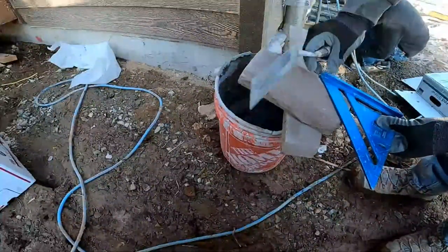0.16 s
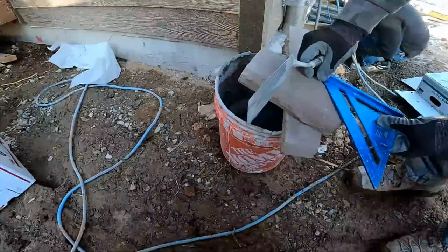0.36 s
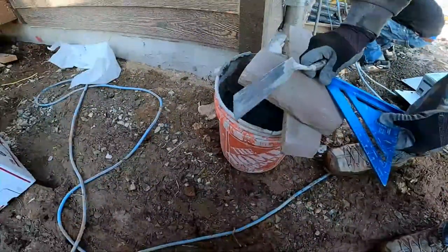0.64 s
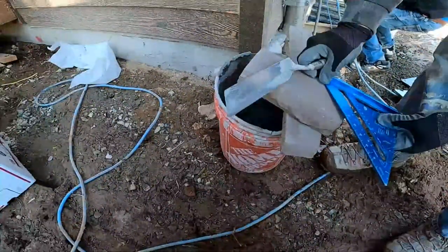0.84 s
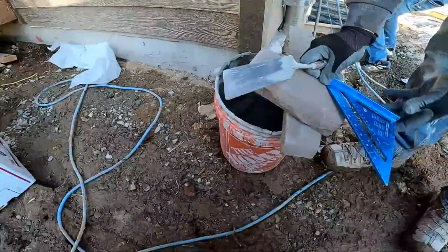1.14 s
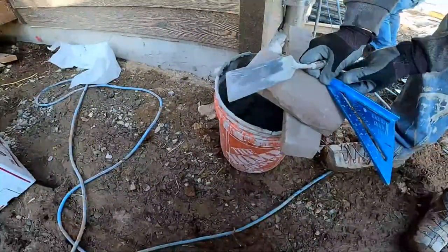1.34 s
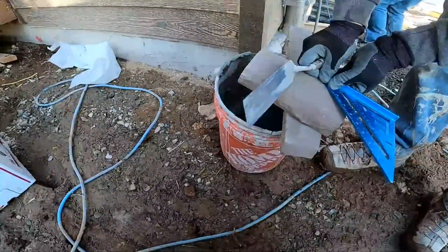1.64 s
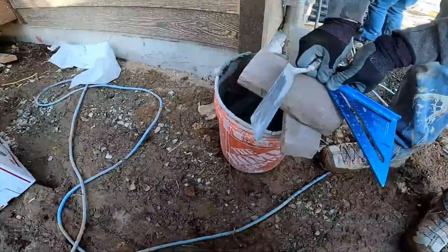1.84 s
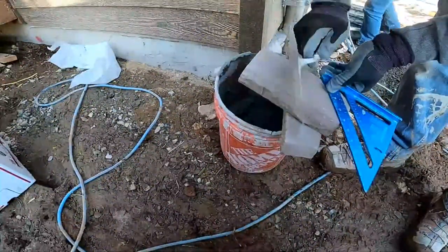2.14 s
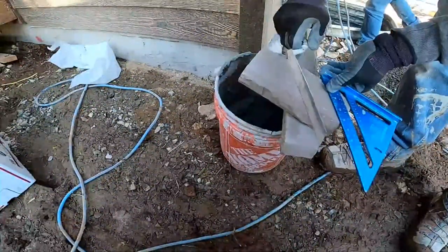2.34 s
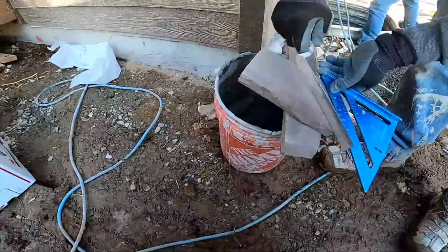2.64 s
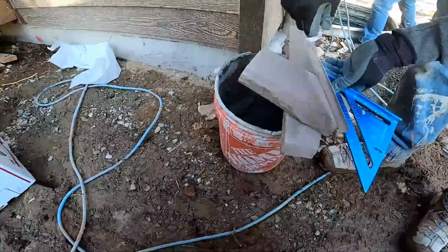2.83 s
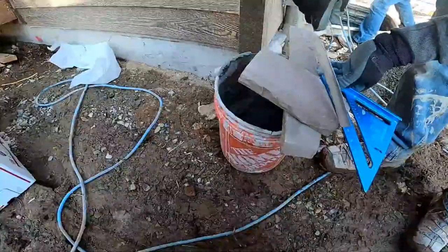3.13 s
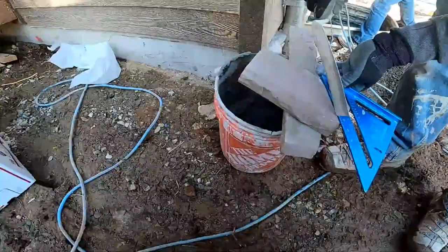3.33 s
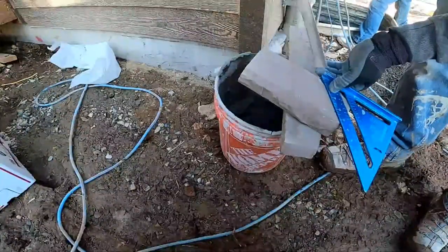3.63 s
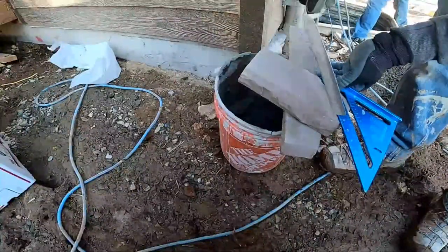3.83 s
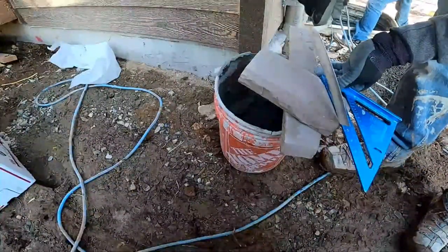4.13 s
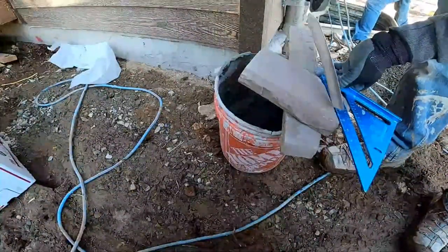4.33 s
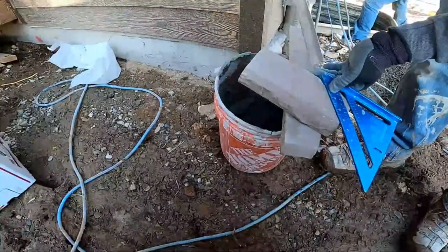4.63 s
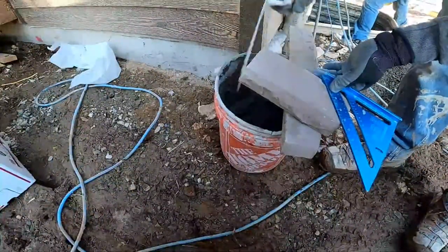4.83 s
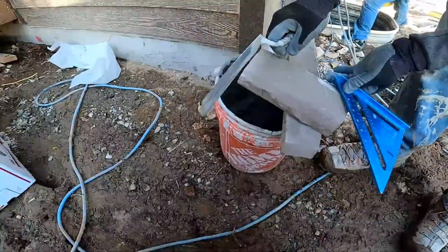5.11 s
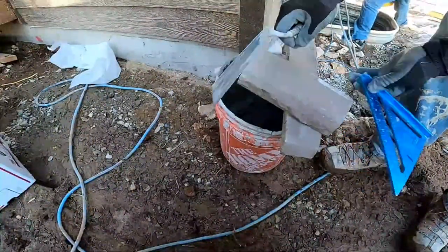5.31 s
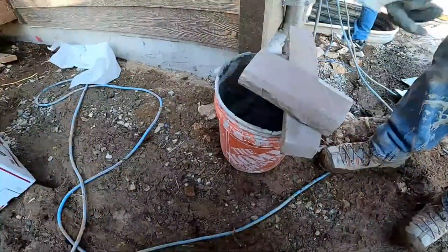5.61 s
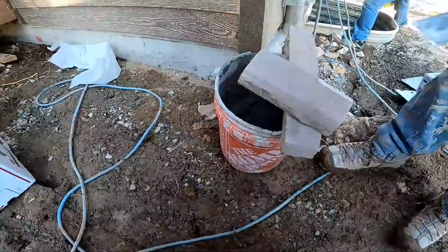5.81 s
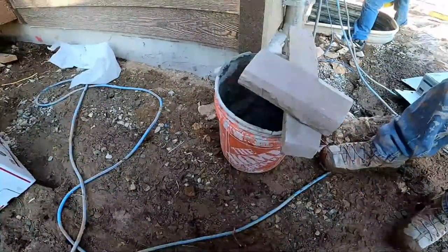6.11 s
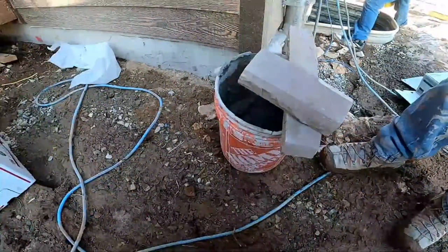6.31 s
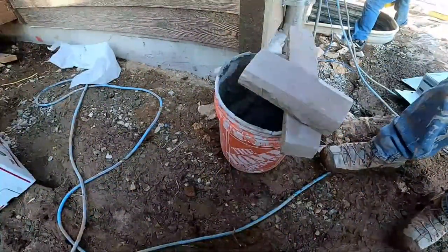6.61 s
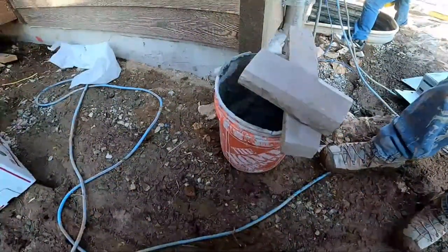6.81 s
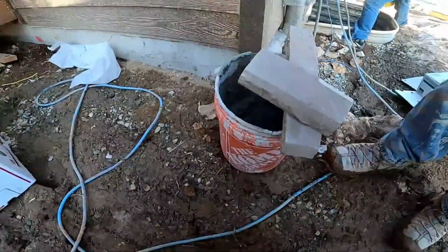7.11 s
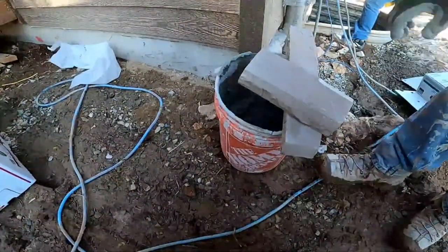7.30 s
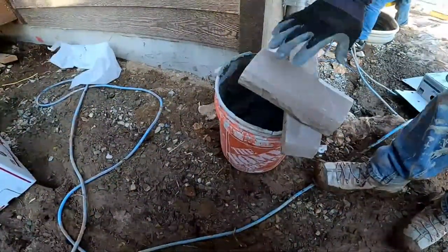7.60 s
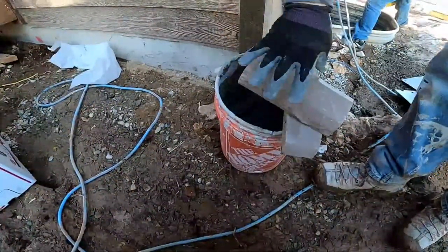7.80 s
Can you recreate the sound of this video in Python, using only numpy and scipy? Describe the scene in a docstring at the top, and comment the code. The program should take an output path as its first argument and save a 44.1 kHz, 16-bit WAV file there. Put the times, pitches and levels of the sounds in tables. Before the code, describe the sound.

A steel trowel scrapes and rings against a metal square amid gritty stone knocks outdoors, then the square drops and something heavy bumps loudly.

```python
"""A steel blade rings and gloves and grit rub at once, outdoors by a wall, over a faint low rumble.
A mason scrapes a trowel along a metal square on a stone slab that rocks on a plastic bucket: coloured
clicks and noise make the rubs, and drive or ring the dying sines of the blade.
The square is dropped and bounces as bursts of modes; something heavy bumps as lumpy resonant noise,
among stone knocks and hollow taps. Scattered echoes and a phase and balance offset spread it in stereo."""
import sys
import numpy as np
from scipy import signal
from scipy.fft import rfft, irfft, next_fast_len
from scipy.io import wavfile
from scipy.ndimage import uniform_filter1d

SR = 44100
rng = np.random.default_rng(int(sys.argv[2]) if len(sys.argv) > 2 else 0)


def wav_out(sig):
    """Save sig, one row per channel (or a flat mono array), as 16-bit PCM at SR to the path in sys.argv[1]."""
    wavfile.write(sys.argv[1], SR, np.round(np.clip(np.atleast_2d(sig).T, -1, 1) * 32767).astype(np.int16))


N = 350595

# Spectrum of the outdoor air: (frequency [Hz], relative level [dB per Hz])
AIR_SPECTRUM = [(20, 0.5), (97, -19.5), (283, 2.5), (632, -11), (1200, -4.5), (2050, -13.5), (7610, -38),
                (12000, -57), (15600, -99)]
AIR_DB = -67.5
# Low outdoor rumble: (time [s], level [dB])
RUMBLE_LEVEL = [(0.0, -71.5), (.75, -58), (1.6, -72.5), (2.3, -64), (3.2, -86), (4.1, -71), (4.6, -80.5),
                (7.94, -70.5)]
RUMBLE_HZ, RUMBLE_WIDTH_HZ = 55, 60  # width of each of two filter passes
# Modes of something hollow nearby: (frequency [Hz], relative level [dB], t60 [s])
HOLLOW_MODES = [(231, -1.5, 0.11), (704, -2.5, 0.23), (1017, -16, 0.099), (1730, -14, .06)]
# Taps on it: (time [s], peak level [dB])
HOLLOW_TAPS = [(5.143, -37), (5.325, -34.5), (5.58, -37.5)]
# Heavy bumping: (time [s], deep shudder level [dB], boom level [dB])
BUMP_LEVELS = [(6.852, -34, -41), (6.935, -15, -28), (6.984, -40, -19.5), (7.079, -16.5, -12),
               (7.129, -28, -19), (7.224, -19, -28.5), (7.33, -36, -45), (7.493, -38, -58),
               (7.934, -68, -89)]
# Bump resonances: (frequency [Hz], width of each of two filter passes [Hz])
SHUDDER, BOOM, CLATTER = (42.7, 37), (151.7, 66), (740, 410)
CLATTER_DB = -12.5  # relative to the boom
# Loose chips jump: (time [s], level before the band filter [dB])
CHIP_TICKS = [(7.0399, -19), (7.1018, -17), (7.1279, -24.5), (7.222, -22.5)]
# Knocks of stone, tools and bucket: (time [s], body peak level [dB], body pitch [Hz],
# crack level before smoothing and colouring [dB])
KNOCK_EVENTS = [(0.504, -51, 160, -37), (0.632, -37, 218, -29), (0.731, -43.5, 252, -25),
                (0.766, -38, 210, -29), (0.887, -38, 219, -24.5), (1.946, -41, 309, -39.5),
                (2.004, -33, 305, -45), (2.06, -31, 312, -26.5), (2.074, -44, 261, -30.5),
                (2.144, -19, 784, -14), (2.198, -28.5, 222, -51), (2.773, -35, 277, -66),
                (2.887, -39, 294, -38.5), (3.034, -41, 222, -19), (3.166, -32.5, 188, -27),
                (3.226, -25, 800, -25), (3.939, -24.5, 363, -24), (3.991, -28.5, 336, -46),
                (4.103, -32, 295, -58), (5.801, -37, 670, -55), (6.552, -43.5, 922, -39),
                (6.862, -14, 159.6, -53), (6.958, -8.5, 193, -10.5), (6.999, -3, 138, -3),
                (7.064, -9.5, 208, -16), (7.087, -6.5, 168.5, -42), (7.218, -15, 202, -26),
                (7.696, -46, 286, -28)]
# Spectrum of cracking stone: (frequency [Hz], relative level [dB per Hz])
CRACK_SPECTRUM = [(300, -34.5), (900, 0.5), (1500, 7), (3000, -6.5), (7500, -6.5), (10000, -66)]
# Modes of the square: (frequency [Hz], t60 [s], then relative level landing on
# the tip [dB], on the edge [dB], flat [dB])
SQUARE_MODES = [(1834, 0.13, -35, -42.5, -7.5), (2850, 0.13, -10, -50, -22), (3196, .15, -20, -27.5, -31),
                (3430, 0.065, -19.5, -28, -19), (4095, 0.098, -14, -66, -5),
                (4713, 0.13, -30, -27.5, -10.5), (5700, 0.25, -13.5, -44, -32), (6216, 0.15, -10, -7.5, 4),
                (7470, 0.061, -16, -22.5, -9), (9020, 0.1, -35, -37, -4.5), ]
# Bounces of the square: (time [s], peak level of its modes [dB], landing [0 tip, 1 edge, 2 flat])
SQUARE_BOUNCES = [(5.991, -28, 0), (6.1031, -11.5, 1), (6.2307, -17, 2), (6.309, -35.5, 2)]
# Long free modes of the blade: (frequency [Hz])
LONG_HZ = [2627, 3079, 3650, 4366]
# The same modes: (t60 [s], depth of the gaps between beams [0-1], place of the first gap [beams])
LONG_BEAMS = [(2.7, 0.19, 0.095), (1.64, 0.2, 0.34), (2.09, 0.8, 0.28), (0.7, 0.44, 0.027)]
# The blade rings free: (time [s], gripped again at [s], head start [beams],
# then starting level of each long mode at full beam [dB])
FREE_RINGS = [(0.0, .43, 0.051, -46.5, -39, -49.5, -43), (3.724, 4.157, -0.43, -44, -34, -41, -25),
              (4.171, 4.19, -0.87, -64, -44.5, -65, -49), (4.684, 5.55, 0.096, -43, -45, -31, -27.5)]
# The wrist turns ever more slowly and sweeps the beams past
TURN_S, BEAMS_PER_TURN, GRIP_DB_PER_S = 0.2004, 2.13, 190
# Short blade modes: (frequency [Hz], relative level [dB], t60 at a grip of 1 [s])
BLADE_MODES = [(722, -14, .1), (1179, -18, .2), (2309, -14, .18), (2977, -14, .3), (3410, -14, .15),
               (3774, -20, .33), (5233, -12, .14), (5590, -24, .24), (6223, -18, .25), (6357, -6, .25),
               (6708, -20, .3), (6836, -14, .37), (7450, -16, .12), (8100, -20, .15), (10830, -16, .07),
               (11950, -22, .15)]
# Bright modes of the blade touching the square: (frequency [Hz], relative level [dB], t60 [s])
PRESSED_MODES = [(2900, -11, 0.33), (3100, -3, 0.21), (3290, -2, 0.18), (3550, -8.5, .25),
                 (4117, 2.5, 0.077), (4380, -4, 0.14), (4722, 0.5, 0.14), (5580, -4.5, 0.18),
                 (6957, 5.5, .06), (7490, -3.5, 0.15), (7700, -12.5, 0.12)]
# The blade ticks against or snaps off an edge: (time [s], peak level of its short modes [dB],
# grip [1 = loose, more = damped])
BLADE_SNAPS = [(1.3606, -38.5, 9.8), (1.4082, -40, 4.8), (1.4272, -48, 7.6), (1.4744, -45, 9),
               (2.107, -36.5, 2), (3.1799, -29.5, 1.97), (3.2245, -36, 3.4), (3.688, -24, 3.5),
               (3.7182, -16, 0.76), (4.176, -33, 2.8), (4.6363, -20, 2.7), (4.6646, -16, 0.82)]
BURST_DB, TOUCH_DB = 5.5, 2  # noise of a snap and pressed modes of a damped tick, relative to the snap
# The blade is dragged or rattles along the square: (start [s], end [s],
# low rasp drive over grit [dB], bright singing drive over hiss [dB])
STROKES = [(.98, 1.95, -18, 20), (3.4, 3.72, -1, 18), (4.37, 4.68, -1, 18)]
# Low modes of the pressed blade: (frequency [Hz], relative level [dB], t60 before contact damping [s])
RASP_MODES = [(766, 16.5, 0.048), (830, -1, 0.1), (1096, 11, 0.12)]
# Spectra of grit on stone, of steel and gloves hissing, and of the bucket drumming:
# (frequency [Hz], relative level [dB per Hz])
GRIT_SPECTRUM = [(240, -33), (400, -7), (808, -1), (1030, 5.5), (2080, 0), (3740, -9.5), (4000, -6.5),
                 (5200, -42.5), (8800, -120)]
HISS_SPECTRUM = [(1180, -28), (2000, -26.5), (3120, -1.5), (5030, -4.5), (8050, -8), (8740, -15.5),
                 (12200, -32), (13900, -56), (14300, -63)]
DRUM_SPECTRUM = [(70, -63.5), (118, -5.5), (194, 1.5), (316, 3.5), (408, 0), (600, -13), (1040, -71.5)]
# Rubs and scrapes: (arrival [s], approach [dB per s], hold [s], growth over the hold [dB],
# dying [dB per s], then on arrival: grit [dB], hiss [dB], drumming [dB])
RUB_EVENTS = [(0.0, 308, 0.067, -7.5, 234, -45.5, -49, -55), (0.39, 136, 0.056, 0.5, 178, -51.5, -53, -63),
              (0.527, 200, 0.028, 4.5, 154, -45.5, -55, -53), (0.7, 500, 0.083, 6, 202, -48.5, -67.5, -64),
              (0.856, 500, 0.057, 0, 200, -49, -62, -52.5), (1.002, 160, 0.26, 1.5, 350, -39, -56.5, -45.5),
              (1.337, 300, 0.5, 0.5, 51, -59.5, -68.5, -65), (1.922, 196, 0.25, 11.5, 113, -68, -75, -51),
              (2.161, 502, 0.0091, -14, 167, -26.5, -49.5, -33), (2.781, 398, 0.025, -9, 21, -52, -60, -45),
              (3.026, 239, 0.017, 9, 393, -40.5, -66, -46), (3.16, 600, 0.033, 1, 182, -45, -63.5, -45),
              (3.474, 248, 0.15, 7, 295, -47.5, -55.5, -55.5),
              (3.693, 204, 0.0072, 1, 345.5, -33.5, -40, -44), (3.765, 300, 0.082, 5, 93, -55.5, -71, -57),
              (3.95, 900, 0.062, -5.5, 131, -45, -65.5, -34), (4.187, 400, .02, -2, 71, -58, -70, -58.5),
              (4.452, 265, 0.2, 8, 352, -45.5, -55.5, -56.5), (5.06, 57, 0.5, -14, 63, -63, -72.5, -61.5),
              (5.624, 93, 0.18, 0.5, 24.5, -47, -67.5, -54),
              (6.39, 96, 0.53, 12.5, 107.5, -69.5, -84.5, -79),
              (6.874, 1500, 0.19, -5.5, 79.5, -42, -55.5, -31),
              (7.114, 196, 0.084, 0, 231, -41.5, -69, -23), (7.44, 98, 0.27, 4, 25, -63, -83, -70.5)]
# Between rubs: (grit [dB], hiss [dB], drumming [dB])
REST_DB = (-84, -81, -67)
# Phase between the microphone ports: (frequency [Hz], lead of the left port [rad])
PORT_LEAD = [(40, 0), (200, -.3), (700, -.2), (2000, -1.2), (3700, -1), (7000, -2.1), (12000, -2)]
# Balance between the ports: (frequency [Hz], left minus right [dB])
PORT_TILT = [(60, 1), (150, 1), (370, -0.5), (910, -1), (2260, -0.5), (5600, 0.5), (13900, -13)]
CEILING, EDGE_HZ = 1.1, 14450  # soft limit of the peaks [full scale], upper band limit


def gain_of(db):
    """Turns decibels into gain."""
    return 10 ** (np.asarray(db) / 20)


def evened(x):
    """Scales to unit rms."""
    return x / np.sqrt(np.mean(x ** 2) + 1e-20)


def read(points, hz):
    """Reads a table on a log-frequency axis."""
    f, value = np.transpose(points)
    return np.interp(np.log(hz + 1), np.log(f + 1), value)


def curves(rows):
    """Gains over time for each level column, silent outside the rows."""
    s, *columns = np.transpose(rows)
    t = np.arange(N) / SR
    return [gain_of(np.interp(t, s, column, left=-200, right=-200)) for column in columns]


def add(mix, s, sound):
    """Mixes a sound in at a time in seconds."""
    part = mix[round(s * SR):][:len(sound)]
    part += sound[:len(part)]


def colour(x, points, band_hz):
    """Causal minimum-phase filter; unit white noise comes out at unit rms inside the band."""
    hz = np.fft.rfftfreq(8192, 1 / SR)
    log_gain = np.log(gain_of(np.maximum(read(points, hz), -100)))
    mirrored = np.r_[log_gain, log_gain[-2:0:-1]]
    phase = -signal.hilbert(mirrored).imag[:len(hz)]
    inside = (hz > band_hz[0]) & (hz < band_hz[1])
    band_power = np.sum(np.exp(2 * log_gain[inside])) / len(hz)
    response = irfft(np.exp(log_gain + 1j * phase)) / np.sqrt(band_power)
    return signal.oaconvolve(x, response[:4096])[:N]


def resonate(x, hz, width):
    """Passes a sound twice through one resonance and evens its level."""
    b, a = signal.iirpeak(hz, hz / width, SR)
    return evened(signal.lfilter(b, a, signal.lfilter(b, a, x)))


def grains(per_s, spread_db, smooth):
    """Sparse clicks of uneven size mixed with a share of smooth noise."""
    size = gain_of(spread_db * np.minimum(rng.exponential(1, N), 4)) * rng.choice([-1, 1], N)
    clicks = evened(size * (rng.random(N) < per_s / SR))
    return np.sqrt(1 - smooth) * clicks + np.sqrt(smooth) * rng.standard_normal(N)


def modes(hz, db, t60, seconds, rise=0.00025, ratio=1):
    """Sum of dying sines with a soft onset, scaled to a peak of 1."""
    t = np.arange(round(seconds * SR))[:, None] / SR
    sines = gain_of(db - 60 * t / t60) * np.sin(2 * np.pi * hz * ratio * t)
    y = sines.sum(1) * (1 - np.exp(-t[:, 0] / rise))
    return y / abs(y).max()


def crack(t60, rise=0.00037):
    """A short dying burst of noise."""
    t = np.arange(3000) / SR
    return rng.standard_normal(len(t)) / 2 * gain_of(-60 * t / t60) * (1 - np.exp(-t / rise))


def ring(x, table, damping):
    """Passes a drive through modes whose ring is shortened by contact."""
    hz, db, t60 = np.transpose(table)
    response = modes(hz, db, t60 * damping, .15)
    return signal.oaconvolve(x, response / np.linalg.norm(response))[:N]


def air():
    """Steady outdoor noise, partly shared by both sides."""
    shared, left, right = (colour(rng.standard_normal(N), AIR_SPECTRUM, (0, SR)) for _ in range(3))
    return gain_of(AIR_DB) * evened(np.array([shared + 0.43 * left, shared + 0.22 * right]))


def rumble():
    """Lumpy low noise that comes and goes, partly different at each port."""
    shared, left, right = (
        resonate(grains(per_s=40, spread_db=4.0, smooth=.4), RUMBLE_HZ, RUMBLE_WIDTH_HZ)
        for _ in range(3))
    return curves(RUMBLE_LEVEL)[0] * (shared + 0.18 * np.array([left, right]))


def wall(x):
    """Short scattered echoes from wall and ground, different for each side."""
    t = np.arange(9000) / SR
    signs = rng.choice([-1., 1.], (2, len(t)))
    sparse = rng.random((2, len(t))) < .06
    echoes = signs * sparse * (t > .002) * gain_of(-60 * t / .08)
    # thin the deep bass in the echoes, so it stays alike on both sides
    echoes = signal.lfilter(*signal.butter(1, 120, "high", fs=SR), echoes)
    return signal.fftconvolve(x[None], echoes / np.linalg.norm(echoes[0]), axes=1)[:, :N]


def taps():
    """Light taps ring the modes of a hollow thing."""
    out = np.zeros(N)
    for s, peak_db in HOLLOW_TAPS:
        add(out, s, gain_of(peak_db) * modes(*np.transpose(HOLLOW_MODES), .25, rise=.001))
    return out


def bumping():
    """Lumpy jolts through three broad resonances of the heavy load and the ground; loose chips tick."""
    out, chips = np.zeros((2, N))
    shudder, boom = curves(BUMP_LEVELS)
    clatter = boom * gain_of(CLATTER_DB)
    for gain, (hz, width) in ((shudder, SHUDDER), (boom, BOOM), (clatter, CLATTER)):
        jolts = grains(per_s=180, spread_db=5.5, smooth=0.28)
        out += uniform_filter1d(gain, size=200) * resonate(jolts, hz, width)
    for s, level_db in CHIP_TICKS:
        add(chips, s, gain_of(level_db) * np.r_[4, crack(.008, rise=.0001)])
    chip_band = signal.butter(5, (3000, 8000), "band", fs=SR, output="sos")
    return out + signal.sosfilt(chip_band, chips)


def knocks():
    """A dull body tone with plate-like overtones and a broad crack on top."""
    out, bursts = np.zeros((2, N))
    ratio = np.array([.62, 1, 1.45, 2.1, 3.1])
    partial_db = np.array([-15.0, 6.0, -0.5, -3.5, -5.5])
    t60 = 0.075 / ratio ** .5
    for s, body_db, hz, crack_db in KNOCK_EVENTS:
        add(out, s, gain_of(body_db) * modes(hz, partial_db, t60, 0.3, rise=0.0016, ratio=ratio))
        burst = np.r_[3.0, crack(.05, rise=.0003)]  # first contact is one sharp click
        dulled = uniform_filter1d(burst, size=round(2600 / hz))  # heavy things crack duller
        add(bursts, s, gain_of(crack_db) * dulled)
    return out + colour(bursts, CRACK_SPECTRUM, (0, SR))


def square():
    """Each bounce rings the modes that its landing reaches, with a short noise crack."""
    out = np.zeros(N)
    hz, t60, *landings = np.transpose(SQUARE_MODES)
    for s, peak_db, landing in SQUARE_BOUNCES:
        add(out, s, gain_of(peak_db) * modes(hz, landings[landing], t60, .4))
        add(out, s, gain_of(peak_db - 13) * crack(0.012))
    return out


def singing():
    """The long modes die away, swell and fade as their beams sweep past, and stop when gripped."""
    out = np.zeros(N)
    for s, gripped, head, *levels_db in FREE_RINGS:
        t = np.arange(0, gripped - s + .3, 1 / SR)
        beams = head + BEAMS_PER_TURN * np.log(1 + t / TURN_S)
        grip_db = GRIP_DB_PER_S * np.maximum(t + s - gripped, 0)
        for hz, db, (t60, depth, gap) in zip(LONG_HZ, levels_db, LONG_BEAMS):
            beam = abs(1 - depth * np.exp(2j * np.pi * (beams - gap))) / (1 + depth)
            gain = np.sqrt(2) * gain_of(db - 60 * t / t60 - grip_db)  # levels are rms
            tone = np.sin(2 * np.pi * (hz * t + rng.random()))
            add(out, s, gain * beam * np.minimum(t / 0.024, 1) * tone)
    return out


def trowel():
    """Snaps ring the short modes under a noise burst; the long modes sing on."""
    out, bursts = np.zeros((2, N))
    hz, db, t60 = np.transpose(BLADE_MODES)
    for s, peak_db, grip in BLADE_SNAPS:
        add(out, s, gain_of(peak_db) * modes(hz, db, t60 / grip, 0.54, rise=0.0018))
        add(bursts, s, gain_of(peak_db + BURST_DB) * crack(.1, rise=.003))
        if grip > 2:  # still touching
            touch = modes(*np.transpose(PRESSED_MODES), .2, rise=.002)
            add(out, s, gain_of(peak_db + TOUCH_DB) * touch)
    return out + singing() + colour(bursts, HISS_SPECTRUM, (0, SR))


def chatter(drive):
    """Each small impact rings one blade mode at a time, so thin tones come and go."""
    table = BLADE_MODES[2:] + PRESSED_MODES + [(f, -4, .2) for f in LONG_HZ]
    which, out = rng.integers(0, len(table), N), np.zeros(N)
    for k, (hz, db, t60) in enumerate(table):
        r, turn = gain_of(-60 / (t60 * SR)), 2 * np.pi * hz / SR  # decay and phase step per sample
        tone = signal.lfilter([1], [1, -2 * r * np.cos(turn), r * r], drive * (which == k))
        # halving the dB brings the mode levels closer together
        out += gain_of(db / 2) * np.sqrt(1 - r) * np.sin(turn) * tone
    return out


def rub_levels():
    """Gains of grit, hiss and drumming: each rub rises, holds while its level drifts, and dies away."""
    t = np.arange(0, N + 64, 64) / SR
    power = gain_of(REST_DB)[:, None] ** 2
    for s, approach_db, hold, growth_db, dying_db, *levels_db in RUB_EVENTS:
        held_db = growth_db * np.clip((t - s) / hold, 0, 1)
        late_db = dying_db * np.maximum(t - s - hold, 0)
        early_db = approach_db * np.maximum(s - t, 0)
        power = power + gain_of(np.array(levels_db)[:, None] + held_db - late_db - early_db) ** 2
    return [np.interp(np.arange(N) / SR, t, np.sqrt(p)) for p in power]


def rubbing():
    """Grit clicks on the slab, hiss, the pressed blade during strokes, and the bucket drumming under load."""
    grit, hiss, drum = rub_levels()
    rasp, sing = np.zeros((2, N))
    for start, end, rasp_db, sing_db in STROKES:
        stroke = slice(round(start * SR), round(end * SR))
        rasp[stroke] = gain_of(rasp_db)
        sing[stroke] = gain_of(sing_db)
    # contact slips and catches
    slips = evened(uniform_filter1d(rng.standard_normal(N), size=700))
    clumps = evened(gain_of(3.52 * slips))
    coarse = grit * clumps * grains(per_s=500, spread_db=4.5, smooth=.3)
    fine = hiss * grains(per_s=3000, spread_db=2.5, smooth=0.16)
    rattle = sing * hiss * grains(per_s=200, spread_db=3.5, smooth=.2)
    blade = ring(rasp * grit * rng.standard_normal(N), RASP_MODES, 0.92) + chatter(rattle)
    blade += gain_of(-13) * ring(sing * hiss * clumps * rng.standard_normal(N), PRESSED_MODES, .6)
    load = drum * grains(per_s=150, spread_db=4.5, smooth=0.41)
    bucket = colour(load, DRUM_SPECTRUM, (200, 500))
    stone = colour(coarse, GRIT_SPECTRUM, (600, 2200))
    return stone + colour(fine, HISS_SPECTRUM, (4500, 5100)) + blade + bucket


def scene():
    """The work and its echoes, over the air and the low rumble."""
    work = rubbing() + trowel() + square() + knocks() + taps() + bumping()
    return work + gain_of(-8) * wall(work) + air() + rumble()


def record(dry):
    """Two close ports differ in phase and balance by frequency; peaks round off, then the band limit."""
    size = next_fast_len(N + 4096)
    hz = np.fft.rfftfreq(size, 1 / SR)
    # each port takes half of the difference
    half = gain_of(read(PORT_TILT, hz) / 2) * np.exp(.5j * read(PORT_LEAD, hz))
    ports = irfft(rfft(dry, size) * np.array([half, 1 / half]), size)[:, :N]
    ports = CEILING * np.tanh(ports / CEILING)
    lowpass = signal.firwin(511, EDGE_HZ, window=("kaiser", 9), fs=SR)
    return signal.oaconvolve(ports, lowpass[None], "same")


dry = scene()
out = record(dry)
wav_out(out)
```